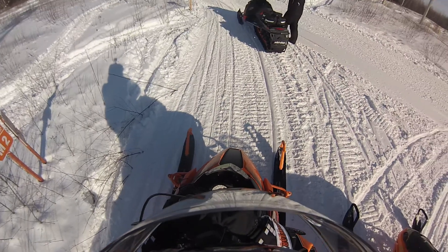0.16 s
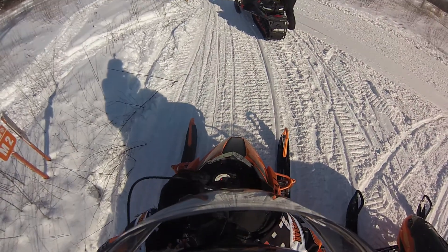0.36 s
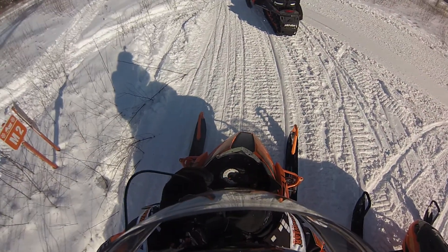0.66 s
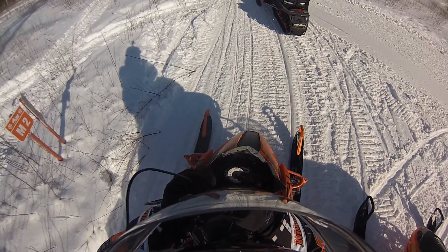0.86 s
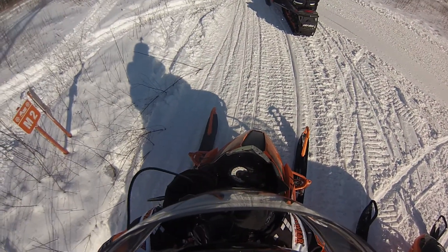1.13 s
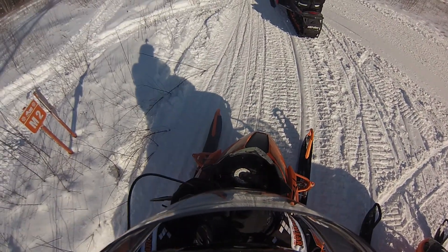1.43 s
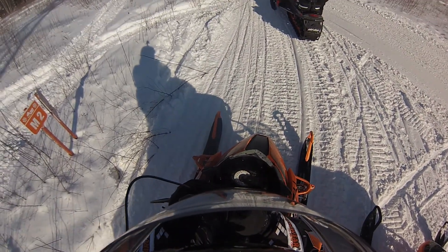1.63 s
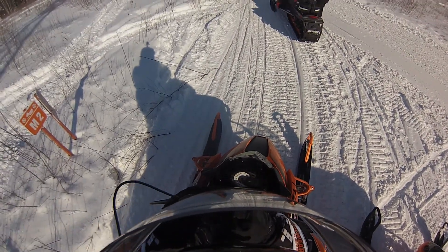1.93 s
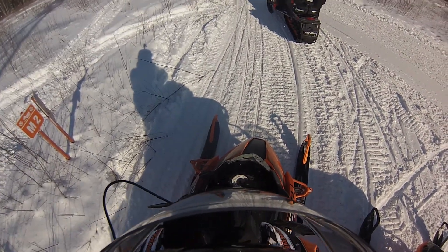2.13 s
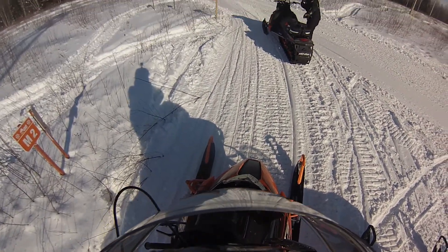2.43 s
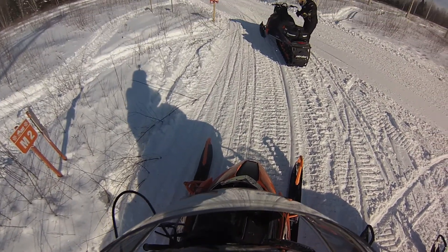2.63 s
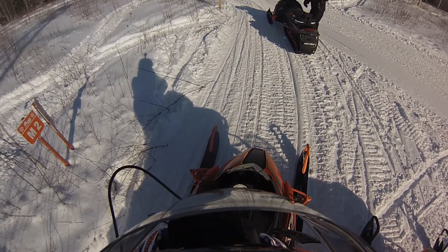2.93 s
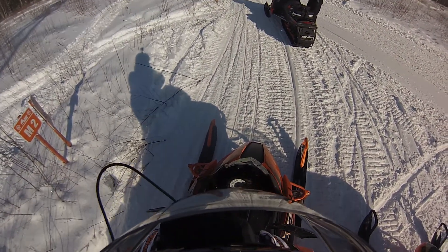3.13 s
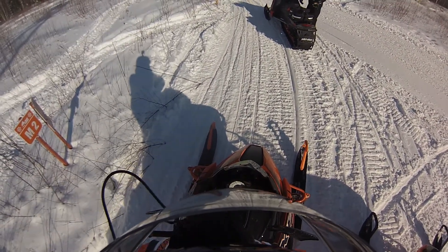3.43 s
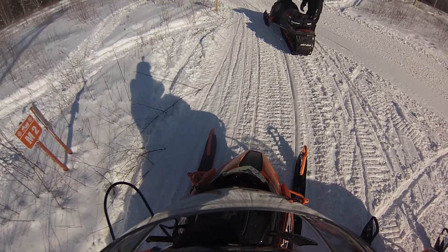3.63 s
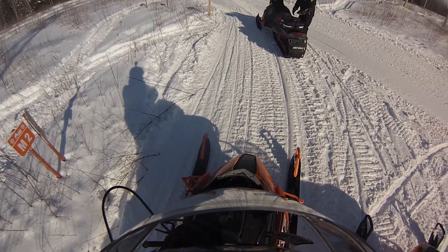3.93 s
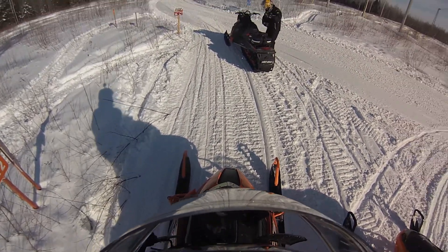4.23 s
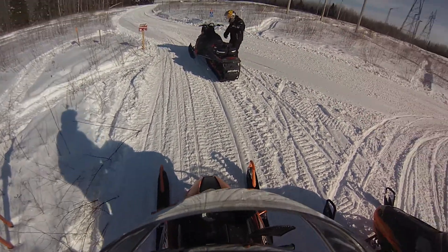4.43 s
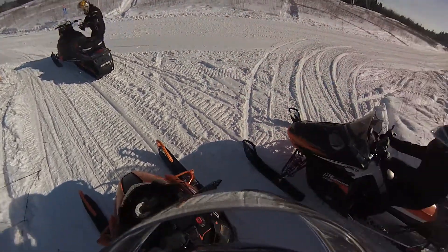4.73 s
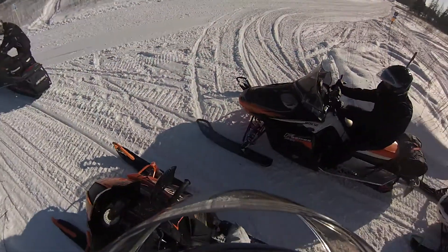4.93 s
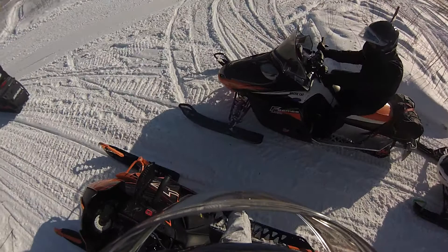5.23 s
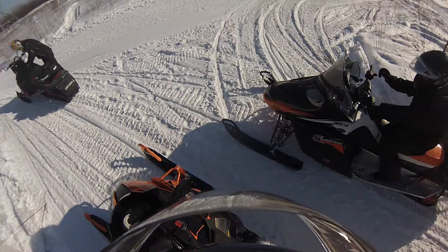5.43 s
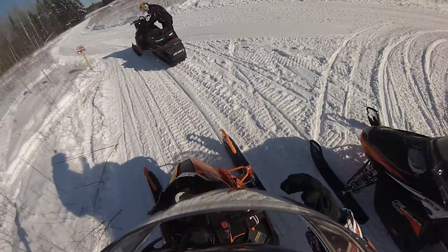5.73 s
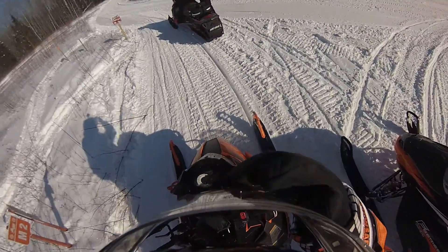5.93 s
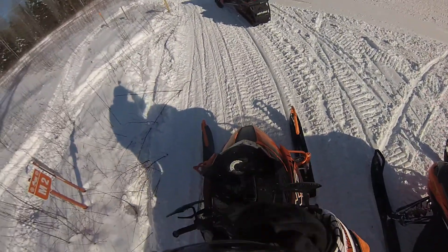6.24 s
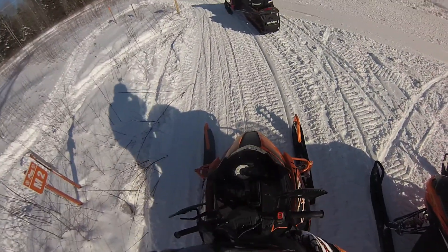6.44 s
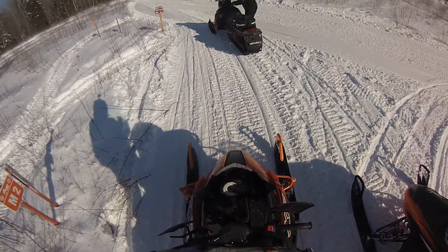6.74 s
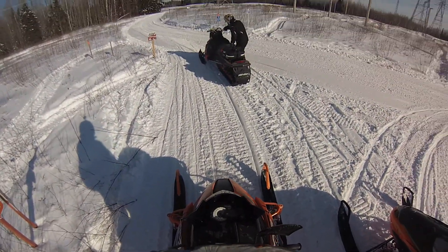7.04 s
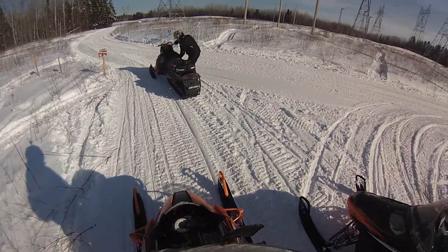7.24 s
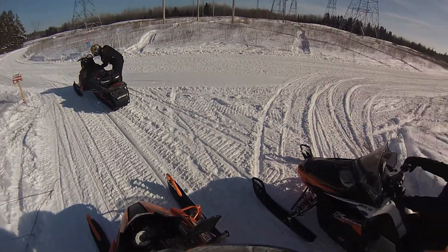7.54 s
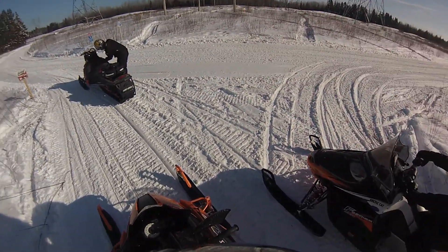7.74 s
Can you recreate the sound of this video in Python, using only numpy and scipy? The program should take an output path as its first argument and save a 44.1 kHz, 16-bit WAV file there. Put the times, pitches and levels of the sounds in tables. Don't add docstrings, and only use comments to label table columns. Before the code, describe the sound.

Muffled snowmobile idle, low throbbing with irregular pops and clatter, interrupted by handling rustle, bumps and one loud scraping thump late on.

```python
import sys
import numpy as np
from scipy import signal
from scipy.fft import rfft, irfft
from scipy.io import wavfile
from scipy.ndimage import uniform_filter1d

SR = 44100
rng = np.random.default_rng(int(sys.argv[2]) if len(sys.argv) > 2 else 0)


def voltage_ratio(decibels):
    exponent = np.asarray(decibels, float) / 20
    return 10 ** exponent


def dump(signal):
    limited = np.clip(np.atleast_2d(signal).T, -1, 1)
    pcm = np.round(limited * 32767).astype(np.int16)
    wavfile.write(sys.argv[1], SR, pcm)


N = 347067
T = np.arange(N) / SR

# time_s, level_db, neighbour_share [0-1]
CLATTER = [(0, -73, 0.02), (2, -72.5, 0.03), (4.2, -72.5, 0.13), (4.7, -68.5, 0.21), (5.3, -66.5, 0.94),
           (5.6, -65.5, 0.78), (5.9, -65, 0.96), (6.5, -64, 0.57), (7, -64.5, 0.69), (7.4, -63.5, 0.57),
           (7.87, -63.5, 0.74)]


def evened(x):
    return x / np.sqrt(np.mean(x ** 2) + 1e-20)


def add(mix, s, sound):
    part = mix[round(s * SR):][:len(sound)]
    part += sound[:len(part)]


def resonate(x, hz, width):
    r = np.exp(-np.pi * width / SR)
    return 2 * signal.lfilter([1 - r], [1, -r * np.exp(2j * np.pi * hz / SR)], x).real


def through(x, peaks, steep=1.5):
    hz = abs(np.fft.fftfreq(8192, 1 / SR))
    power = sum(voltage_ratio(2 * db) / (1 + (2 * (hz - f) / w) ** 2) ** steep for f, w, db in peaks)
    spectrum = np.exp(np.conj(signal.hilbert(np.log(power + 1e-12) / 2)))
    response = np.fft.ifft(spectrum).real[:4096]
    return signal.oaconvolve(x, response)[:len(x)]


def wander(hz):
    low_pass = signal.butter(2, hz, fs=SR, output="sos")
    return evened(signal.sosfilt(low_pass, rng.standard_normal(N)))


def ring(modes, lead=0., rise=0.0011):
    t = np.arange(SR) / SR
    tones = sum(voltage_ratio(db - 60 * t / t60) * np.cos(2 * np.pi * hz * (t - lead)) for hz, db, t60 in modes)
    return tones * (1 - np.exp(-(t / rise) ** 2))


def swell(start, hold, db, fade_db, rise_db):
    return voltage_ratio(db - rise_db * np.maximum(start - T, 0) - fade_db * np.maximum(T - start - hold, 0))


def engine():
    # time_s, ahead_turns
    crank = [(0, 0), (.225, 0), (.525, .22), (.825, .15), (1.575, -.19), (2.175, -.155), (2.45, -.1),
             (2.775, -.235), (3.375, .017), (4.375, -.52), (5.175, .14), (5.775, .24), (6.225, .09),
             (6.5, .09), (6.825, -.064), (7.125, .09), (7.45, .14), (7.87, .48)]
    # order, level_db, lag_cycles
    pumping = [(1, -70, 0.022), (2, -83, 0.058), (4, -52, 0.13)]
    # mode_hz, level_db, t60_s
    exhaust = [(110.5, -44, 0.11)]
    # mode_hz, level_db, t60_s
    silencer = [(102.1, -55.5, 0.33)]
    # mode_hz, level_db, t60_s
    pipe = [(138, -47, 0.056)]
    # mode_hz, level_db, t60_s
    port = [(173, -65, 0.15), (202, -71.5, 0.062), (260, -70, 0.021), (337, -65, 0.045), (388, -69, 0.061),
            (530, -79, 0.022)]
    # first_s, last_s, strength_db
    burns = [(.038, .038, 4), (.148, .234, .6), (.291, .291, -3.3), (.402, .402, -.7), (.52, .52, 0),
             (.676, 3.185, .3), (3.269, 3.706, -1.5), (3.757, 4.02, -1.6), (4.072, 4.161, -3.5),
             (4.25, 4.675, -.5), (4.843, 4.843, 0), (4.973, 4.973, -1.5), (5.022, 5.022, 4),
             (5.076, 5.251, 1), (5.359, 5.701, -1.5), (5.819, 6.083, -.5), (6.147, 6.147, -.6),
             (6.446, 6.446, 5), (6.593, 6.593, -1), (6.672, 6.849, -1.5), (7.017, 7.017, 0),
             (7.069, 7.069, -2), (7.174, 7.174, -.5), (7.217, 7.217, 3.5), (7.273, 7.444, 3),
             (7.49, 7.49, -1), (7.563, 7.563, 0), (7.729, 7.729, 0), (7.78, 7.78, 1)]
    idle_per_s = 29
    burn_every, burn_at, burn_grid = 2.5, .04, 4
    burn_spread_db, crack_near_db = .9, 9

    turns = idle_per_s * T + uniform_filter1d(np.interp(T, *np.transpose(crank)), size=4000)
    out = sum(voltage_ratio(db + 1.2 * wander(13.0)) * np.cos(2 * np.pi * (k * turns + lag)) for k, db, lag in pumping)

    lead, crack_lead = .011, .005
    thud = ring(exhaust, lead=0.011, rise=0.0052) + ring(silencer, lead=0.0111, rise=0.0053)
    add(thud, lead, ring(pipe, lead=0.00827, rise=0.0059))
    crack = ring(port, lead=.0045, rise=0.0045)
    when, _, turned = np.transpose(CLATTER)
    for first_s, last_s, db in burns:
        first, last = np.interp([first_s, last_s], T, turns)
        first = burn_at + round((first - burn_at) * burn_grid) / burn_grid
        for k in range(round((last - first) / burn_every) + 1):
            s = np.interp(first + k * burn_every, turns, T)
            gain = voltage_ratio(db + burn_spread_db * rng.standard_normal())
            crack_gain = voltage_ratio(crack_near_db * np.interp(s, when, turned))
            puff = rng.standard_normal(2000) * voltage_ratio(-60 * T[:2000] / 0.036)
            add(out, s - lead, gain * thud)
            add(out, s - crack_lead, gain * crack_gain * crack)
            add(out, s - lead, gain * voltage_ratio(-53.5) * resonate(puff, 270, 150))
    return out


def rattle(parts, turns):
    out = np.zeros(N)
    for hz, width, db, swing_db, lag in parts:
        noise = rng.standard_normal(N)
        shake = evened(voltage_ratio(swing_db * np.cos(2 * np.pi * (turns - lag))) * noise)
        strikes = evened(np.diff(np.floor(turns - lag), prepend=0) * (1 + .25 * noise))
        drive = shake + voltage_ratio(2 * swing_db - 15) * strikes
        part = resonate(resonate(drive, hz, 1.06 * width), hz, 2.7 * width)
        out += voltage_ratio(db) * np.sqrt(width) * evened(part)
    return evened(out)


def clatter():
    # mode_hz, width_hz, level_db, swing_db, lag_turns
    case_far = [(791, 75, -2.5, 2.5, .5), (1396, 53, -2, 0, .2), (1532, 65, 2, 4.5, 0.095),
                (2030, 198, -5, 1, 0.3), (2500, 92, -9, 3.5, 0.05), (3064, 110, -17, 8.5, 0.1),
                (3360, 170, -16, 4, 0.8), (4202, 81, -14, 16.5, 0.92), (4760, 200, -25.5, 5, 0.56),
                (4960, 120, -20.5, 3.5, .35)]
    # mode_hz, width_hz, level_db, swing_db, lag_turns
    case_near = [(360, 63, -7, 3, 0.7), (816, 28, -2, 4.7, 0.3), (1434, 41, 1.5, 1.9, 0.6),
                 (1549, 125, 0, 1.4, 0.05), (1994, 210, -9, 2.876, 0.8), (2482, 71, -7, 1.6, 0),
                 (3358, 130, -8.5, 4.4, 0.1), (4600, 200, -19.5, 2.7, .7), (5140, 98, -20.5, 7.2, 0),
                 (6660, 250, -30, 2, .2), (7500, 300, -27, 2, 0.05)]
    rattle_per_s = 29.95

    s, db, share = np.transpose(CLATTER)
    share = np.clip(np.interp(T, s, share), 0, 1)
    turns = np.cumsum(rattle_per_s + 0.15 * wander(6.2)) / SR
    both = (1 - share) * rattle(case_far, turns) + share * rattle(case_near, turns)
    return voltage_ratio(np.interp(T, s, db) + 0.65 * wander(50)) * both, share


def wash(share):
    # frequency_hz, density_db [dB per Hz]
    wash_spectrum = [(120, -24.5), (190, -2), (240, -11), (380, -8.5), (560, -19.5), (1100, -21),
                     (2000, -19.5), (2800, -31.5), (4000, -28.5), (6000, -33.5), (9000, -36.5),
                     (13500, -37.5)]
    wash_db = -74

    hz = np.fft.rfftfreq(N, 1 / SR)
    f, db = np.transpose(wash_spectrum)
    breath = voltage_ratio(.5 * wander(40))
    shape = voltage_ratio(np.interp(np.log(hz + 1), np.log(f), db))
    noise = irfft(rfft(rng.standard_normal(N) * breath) * shape, N)
    near = share * voltage_ratio(-5) * resonate(noise, 1500, 5500)
    return voltage_ratio(wash_db) * (noise + near) / noise.std()


def rumble(share):
    rumble_db, gust_db, gust_hz, near_db = -61.5, 1.5, 1, 5.5
    level = voltage_ratio(rumble_db + gust_db * wander(gust_hz) + near_db * share)
    return level * evened(resonate(resonate(rng.standard_normal(N), 30, 44), 22, 43))


def mount():
    # crest_s, crest_db, climb_db_per_s, quick_drop_db, climb_hz
    shakes = [
        (5.165, -36, 96, 6.5, 47.2),
        (7.365, -35, 91, 6.5, 46),
    ]
    # start_s, level_db, swing_hz, t60_s, rise_s
    blows = [
        (.41, -61.5, 312, 0.14, 0.0068),
        (0.936, -62, 260, 0.15, 0.0093),
        (1.44, -59.5, 260, 0.22, .012),
        (4.715, -46, 37.7, 0.42, 0.0057),
        (6.007, -29.5, 36.9, 0.69, 0.011),
        (6.254, -6, 44.1, 0.22, 0.017),
        (6.35, -21.5, 37.9, 0.66, 0.0032),
    ]
    swing_hz, slowing_s, sag_hz_per_s = 38.8, 0.15, 5.3
    drop_s, fade_db_per_s, span_s = 0.084, 33, .24

    out = np.zeros(N)
    for crest, db, climb_db, drop_db, climb_hz in shakes:
        after = np.maximum(T - crest, 0)
        hz = np.interp(T, [crest - slowing_s, crest], [climb_hz, swing_hz])
        hz = hz - sag_hz_per_s * np.minimum(after, 1)
        level = swell(crest, 0, db, fade_db_per_s, climb_db) * voltage_ratio(-drop_db * np.minimum(after / drop_s, 1))
        held = voltage_ratio(-500 * np.maximum(after - span_s, 0))
        cycles = (np.cumsum(hz) - hz[T < crest].sum()) / SR
        out += level * held * np.sqrt(2) * np.cos(2 * np.pi * cycles)
    for s, db, hz, t60, rise in blows:
        add(out, s, ring([(hz, db, t60)], lead=1 / (4 * hz), rise=rise))
    return out


def ticks():
    # start_s, peak_db, body_hz, edge_hz, edge_db
    tick_events = [(1.085, -62, 2060, 3480, -3), (1.105, -68, 2500, 4700, -10),
                   (2.221, -48, 2000, 4680, -14.5), (2.797, -57, 2130, 4700, -17),
                   (3.5534, -53.5, 2070, 4530, -14), (4.2224, -53.5, 2040, 4700, -24),
                   (4.7192, -53.5, 1930, 4600, -8), (4.8919, -61, 1960, 4600, 0),
                   (4.9382, -56, 2080, 4550, 3), (5.304, -59, 1900, 3500, -13),
                   (5.963, -48, 2100, 4700, -21), (5.975, -58, 1500, 4400, -22),
                   (5.984, -43, 1575, 4730, -43), (6.177, -57, 1420, 4450, -20),
                   (6.3764, -54.5, 1830, 4730, -21)]

    out = np.zeros(N)
    t = T[:600]
    for s, db, hz, edge_hz, edge_db in tick_events:
        burst = rng.standard_normal(600)
        edge = resonate(resonate(burst, edge_hz, 520), edge_hz, 1800) * voltage_ratio(edge_db + 15.0 - 60 * t / 0.028)
        body = resonate(resonate(burst, hz, 730), hz, 730) * voltage_ratio(9.5 - 60 * t / 0.041)
        add(out, s, voltage_ratio(db) * (edge + body))
    return out


def cloth():
    # mode_hz, width_hz, level_db
    case_rubbed = [(330, 170, -5.5), (840, 370, -10.5), (1600, 180, 1.5), (2080, 260, -1.5), (2446, 51, -3),
                   (3650, 400, -12.5), (4605, 170, -9.5), (4750, 90, -20), (6700, 200, -23),
                   (7460, 300, -26), (8900, 500, -28), (11500, 600, -30.5)]
    # start_s, hold_s, level_db, fade_db_per_s
    rubs = [
        (4.72, 0.011, -60.5, 178),
        (4.843, 0.37, -58.5, 200),
        (4.931, 0.012, -62, 200),
        (5.22, 0.16, -68.5, 27),
        (5.966, 0.0096, -62, 403),
        (7.17, 0.24, -70, 300),
    ]
    rise_db_per_s = 900

    grains = rng.standard_normal(N) * voltage_ratio(1.14 * wander(130))
    pressure = np.sqrt(sum(swell(*row, rise_db_per_s) ** 2 for row in rubs))
    return pressure * evened(through(grains, case_rubbed, steep=1.28))


def creak():
    # start_s, hold_s, level_db, fade_db_per_s, loose_share [0-1]
    creaks = [
        (4.926, .09, -58.5, 150, 0.37),
        (5.06, 0.13, -66, 200, .6),
        (5.993, .005, -50, 596, 0.34),
        (7.169, 0.12, -58.5, 394, 0.56),
    ]
    rise_db_per_s, slips_per_s = 593, 39

    slips = np.diff(np.floor(slips_per_s * T), prepend=0) + 0.019 * rng.standard_normal(N)
    narrow = evened(resonate(resonate(slips, 459, 18), 390, 110))
    chatter = resonate(resonate(resonate(slips, 377, 160), 384, 130), 340, 160)
    wide = evened(chatter + 0.5 * resonate(slips, 283, 57))
    return sum(swell(*row, rise_db_per_s) * ((1 - loose) * narrow + loose * wide) for *row, loose in creaks)


def glove():
    # centre_s, peak_db, length_s
    glove_slips = [(6.268, -34.5, .02), (6.287, -35, .02), (6.31, -47, .015), (6.2515, -26, 0.0021),
                   (6.256, -30, 0.0026), (6.262, -24, 0.00313), (6.272, -28.5, 0.0026),
                   (6.2763, -18.5, 0.00263), (6.279, -27.5, 0.0027), (6.288, -23, 0.0026),
                   (6.294, -19.5, 0.0028), (6.302, -32.5, 0.0028), (6.306, -19.5, 0.00327),
                   (6.311, -26.5, 0.0023), (6.321, -21, 0.00334), (6.33, -17, 0.0027),
                   (6.3334, -12.5, 0.00234), (6.338, -17.5, .002), (6.344, -54, 0.00426)]
    # mode_hz, width_hz, level_db
    case_struck = [(247, 170, -6), (317, 44, -11.5), (460, 71, -4.5), (726, 25, -9), (1260, 120, -35),
                   (1575, 266, -2.5), (2070, 244, -4), (2980, 340, -19.5), (3400, 230, -28),
                   (3990, 89, -31), (4600, 310, -27), (5420, 300, -35.5), (6560, 370, -50)]
    # mode_hz, width_hz, level_db
    case_edge = [(6640, 500, -47), (7840, 1100, -51.5), (9100, 900, -51.5), (12000, 1500, -59)]
    # mode_hz, level_db, t60_s
    door = [(1650, -36, 0.02), (1680, -14, 0.04), (2000, -14, 0.024)]
    # mode_hz, level_db, t60_s
    after_ring = [(238, -27.5, 0.2), (427, -23.5, 0.081), (731, -50.5, 0.23), (585, -52, 0.12),
                  (150.7, -28, 0.2), (110.7, -36, 0.5)]
    hard_db, hardness = -17, 0.56
    door_s, after_ring_s = 6.3305, 6.33

    drive, hard, t = np.zeros(N), np.zeros(N), T[:3000]
    for s, db, length in glove_slips:
        pulse = 2 * t / length * np.exp(1 - 2 * t / length)
        slip = voltage_ratio(db) * pulse * rng.standard_normal(3000)
        add(drive, s - length / 2, slip)
        add(hard, s - length / 2, voltage_ratio(hardness * (db - hard_db)) * slip)
    low_pass = signal.butter(2, 6000, fs=SR, output="sos")
    body = signal.sosfilt(low_pass, through(drive, case_struck, steep=1.54))
    out = voltage_ratio(16.5) * (body + through(hard, case_edge, steep=1.3))
    add(out, door_s, ring(door, lead=0.00233, rise=0.0012))
    add(out, after_ring_s, ring(after_ring, rise=0.003))
    return out


def scene():
    noise, share = clatter()
    machines = engine() + noise + wash(share) + rumble(share)
    handling = mount() + ticks() + cloth() + creak() + glove()
    return (machines + handling)[None]


def band_limit(x):
    return signal.sosfilt(signal.butter(12, 12750, fs=SR, output="sos"), x)


def record(dry):
    return band_limit(dry)


dry = scene()
out = record(dry)
dump(out)
```